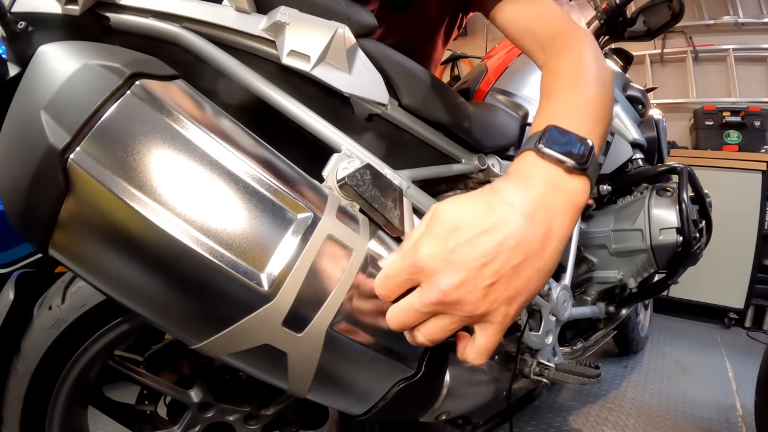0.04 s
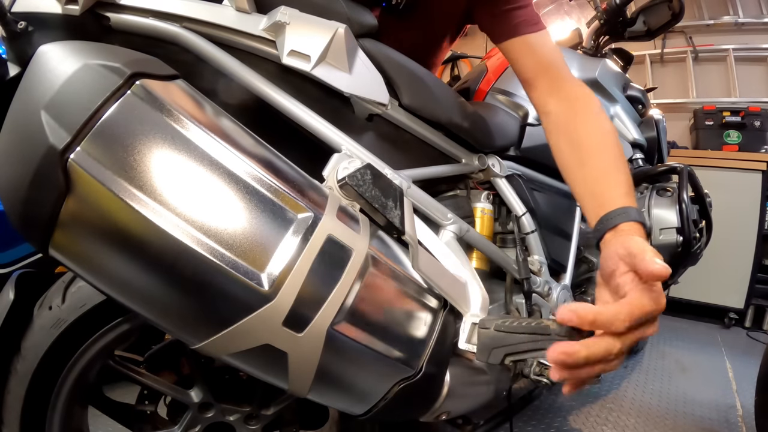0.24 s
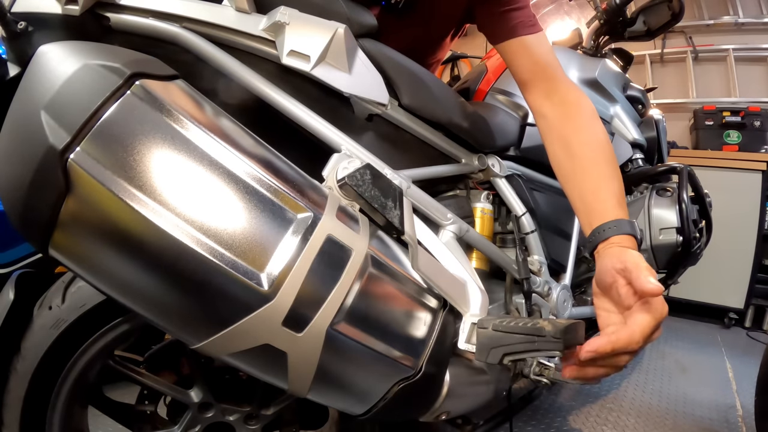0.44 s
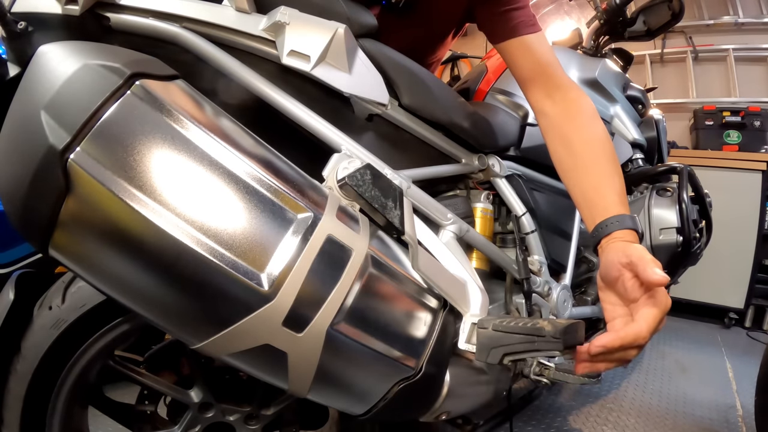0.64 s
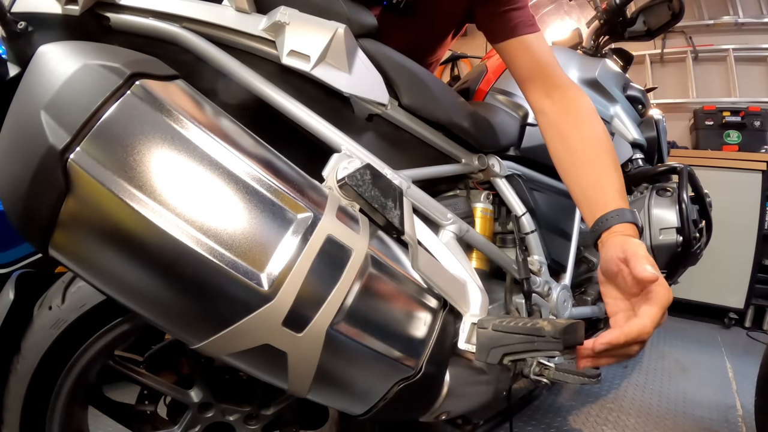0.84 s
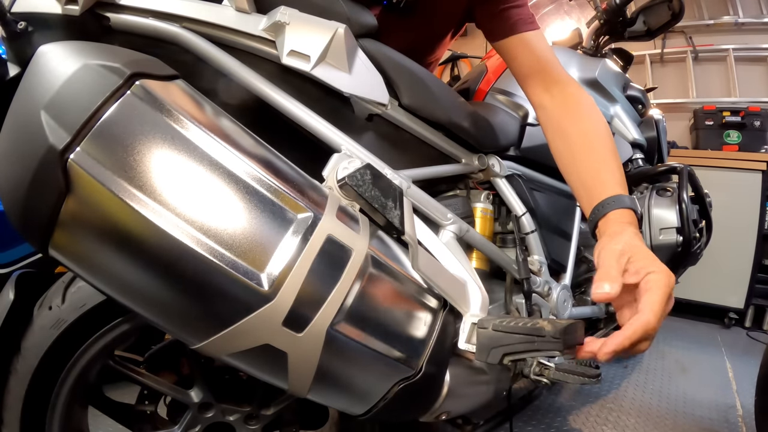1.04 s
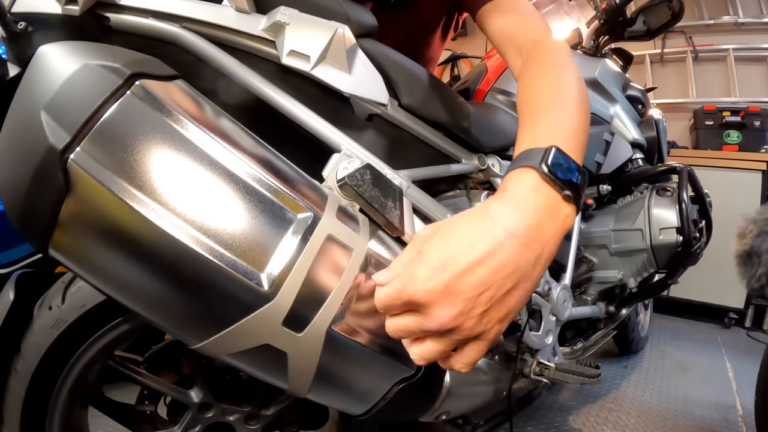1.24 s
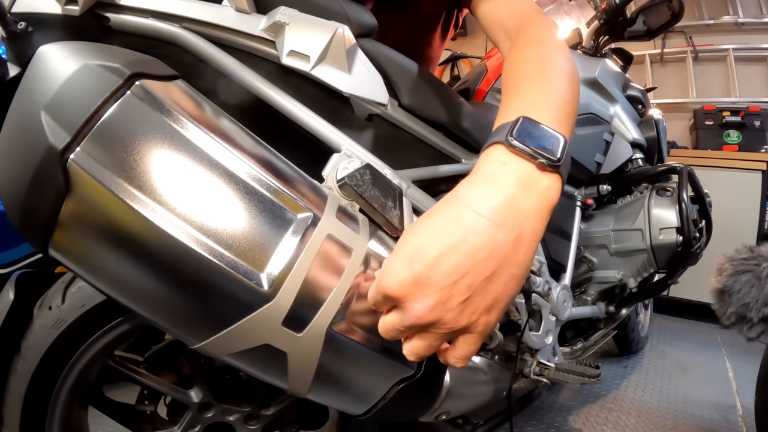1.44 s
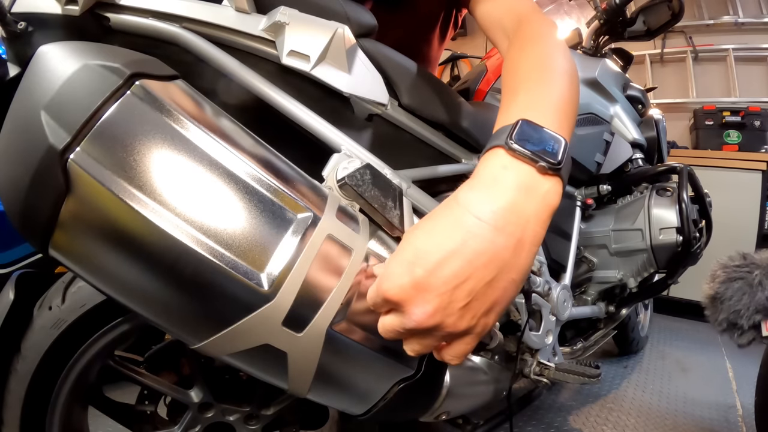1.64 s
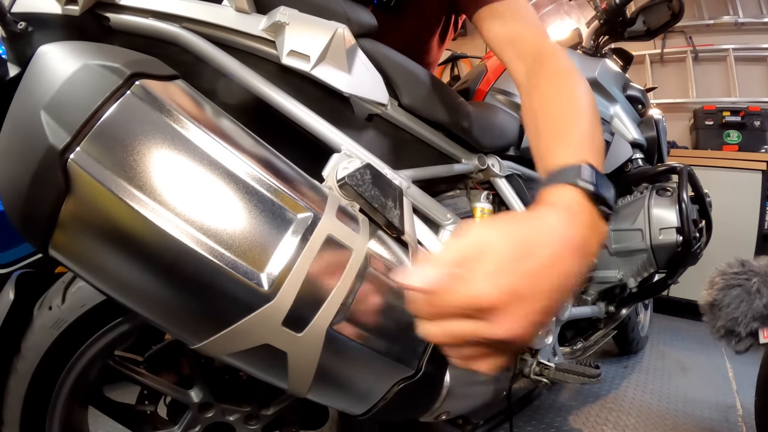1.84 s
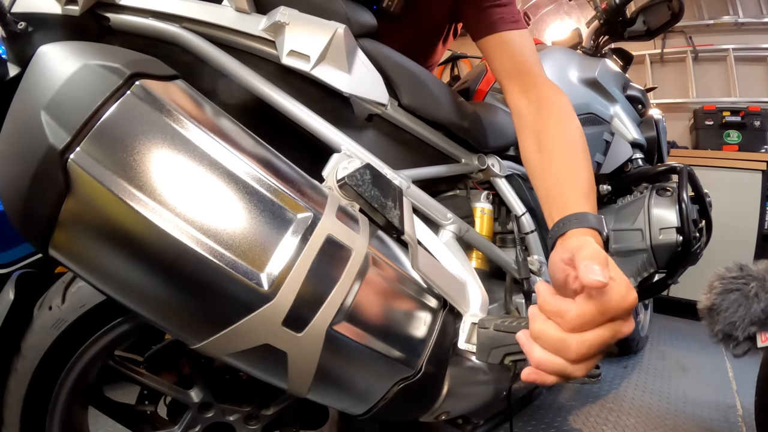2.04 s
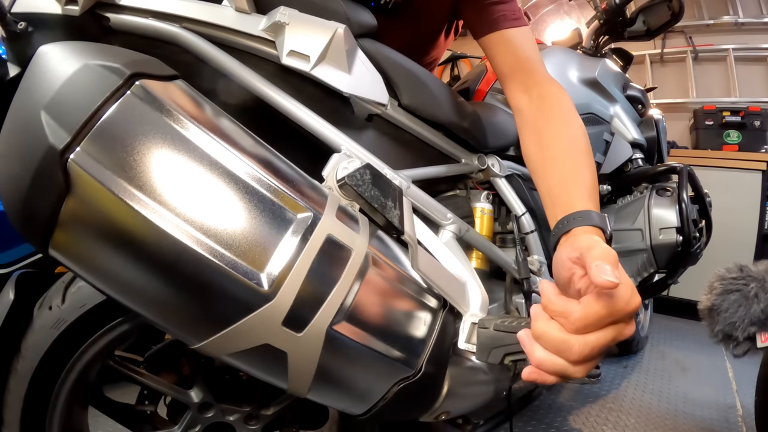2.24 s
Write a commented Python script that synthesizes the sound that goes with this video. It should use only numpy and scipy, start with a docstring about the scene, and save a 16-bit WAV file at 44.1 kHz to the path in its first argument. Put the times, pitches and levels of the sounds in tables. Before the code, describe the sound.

A hand knocks on a hollow steel motorcycle silencer, very close and loud. Faint low hum, rumble and hiss run throughout. After a tiny swish, the first bright crack and hollow thump land at 0.25 s, with brief metallic ring and garage echo. At 1.17 s sound drops out momentarily; hum returns lower, with small handling ticks around 1.2-1.3 s. A slightly duller second knock follows at 1.97 s, ringing out.

```python
"""Two close taps by a hand on the steel silencer of a parked motorcycle in a garage.
From the start: low hum (three harmonics), rumble and hiss (shaped noise), small handling ticks (noise bursts).
Near 0.25 s, first tap after a faint swish: skin crack (noise burst), can thump (filtered impulse), metallic
ring (decaying sines), room echo (decaying noise). Near 1.17 s the sound drops out for an instant; the hum
returns lower. Near 1.97 s, second tap, built the same way."""
import sys
import numpy as np
from scipy import signal
from scipy.fft import rfft, irfft, next_fast_len
from scipy.io import wavfile
from scipy.ndimage import uniform_filter1d, minimum_filter1d

SR = 44100
rng = np.random.default_rng(int(sys.argv[2]) if len(sys.argv) > 2 else 0)


def to_wav(sig):
    """Store sig (one row per channel, or 1-D mono) as 16-bit WAV at the path in sys.argv[1].

    Samples outside -1..1 are clipped; the rate is SR.
    """
    pcm = np.clip(np.atleast_2d(sig), -1, 1) * 32767
    pcm = np.round(pcm).astype(np.int16)
    wavfile.write(sys.argv[1], SR, pcm.T)  # frames by channels


N = 101429
TIME_S = np.arange(N) / SR
SIZE = next_fast_len(N, real=True)
FREQS_HZ = np.maximum(np.fft.rfftfreq(SIZE, 1 / SR), 1)

# Hum: t/s, pitch f/Hz, fundamental level/dB, second harmonic level/dB
HUM = [(0, 76.2, -56.5, -82), (.15, 72.5, -52.5, -65.5), (.66, 73.7, -54.5, -70.5), (.77, 72.36, -59, -70),
       (.97, 72.77, -50.5, -64), (1.16, 71.7, -49, -66), (1.19, 67.3, -51.5, -62.5),
       (1.52, 66.17, -51, -62.5), (1.68, 64.5, -55.5, -55.5), (1.85, 65.3, -47.5, -59),
       (1.98, 65.3, -39, -51), (2.12, 65.46, -47.5, -55), (2.22, 65.6, -54.5, -45.5),
       (2.3, 65.5, -51.5, -73)]
# Room rumble and hiss, relative spectra: f/Hz, density/(dB per Hz)
RUMBLE_SPECTRUM = [(25, -16.5), (45, -13), (85, 5), (140, -1.5), (300, -6), (700, -9), (1200, -18.5),
                   (2500, -42.5), (8000, -54.5)]
HISS_SPECTRUM = [(200, -8), (1200, 3), (2500, -0.5), (4500, -2), (8000, -9), (15500, -26)]
# Air levels: t/s, rumble level/dB, hiss level/dB
AIR_LEVELS = [(0, -60.5, -67), (.8, -59, -70), (1.16, -59, -70), (1.2, -51, -60.5), (1.34, -55.5, -59.5),
              (1.55, -56.5, -65.5), (1.85, -55.5, -64.5), (2.3, -51, -64.5)]
# Light touches and handling ticks: t/s, level/dB, centre f/Hz, half-width/octaves, T60/s
TICKS = [(.003, -58, 940, 0.29, .25), (.122, -62, 4500, 0.058, 0.048), (.202, -46.5, 4500, 0.97, .03),
         (0.629, -55.5, 1220, 0.09, 0.17), (1.198, -48.5, 787, 1.2, 0.044), (1.282, -52.5, 1180, .12, 0.13),
         (1.288, -48, 610, .3, 0.058), (1.294, -49.5, 2000, .7, 0.022), (1.309, -49, 1800, 0.65, 0.033),
         (1.893, -52, 745, 0.48, 0.24), (1.899, -47.5, 5420, .9, 0.024), (1.9527, -35.5, 4120, .6, 0.039),
         (1.954, -31, 327.2, .5, 0.42), (2.199, -60, 3042, 1.3, .03)]
# Swish ahead of each tap, relative spectrum: f/Hz, density/(dB per Hz)
SWISH_SPECTRUM = [(100, -6), (500, 2), (1500, -9), (4000, -9.5), (7000, -14.5), (15000, -33.5)]
# Taps: t/s, level/dB, treble slope/(dB per octave), crack level/dB, thump level/dB, thump f/Hz,
# thump width/ratio, low thud level/dB
TAPS = [(.2468, 0.5, -0.5, 2.5, 2, 480, 1.36, -13), (1.9733, -2, -4.5, 3, 0, 578.4, 1.27, -17)]
# Crack of the steel skin, relative spectrum: f/Hz, density/(dB per Hz)
CRACK_SPECTRUM = [(100, -15), (300, -12.5), (650, -2), (1100, -6.5), (1600, -9), (2400, -4), (3250, 3),
                  (4500, -11), (5600, -13.5), (7100, -7), (8600, -24), (10300, -22.5), (15500, -39)]
# Shell modes, strength set by the spot struck: f/Hz, T60/s, first tap level/dB, second tap level/dB
SHELL_MODES = [(140, .25, -25, -22), (393.2, 0.24, -15.5, -25), (480, 0.1, -15, -19),
               (597, .22, -14.5, -23), (653, .14, -23, -10), (850, .22, -25.5, -31.5),
               (887, .15, -23.5, -17), (1047, 0.22, -29.5, -37), (1145, .2, -25.5, -23),
               (1277, .19, -23.5, -30), (1697, .18, -29.5, -24), (2135, 0.29, -32, -30.5),
               (2512, 0.21, -29, -21.5), (2866, .15, -29.5, -37), (3130, .22, -29.5, -27.5),
               (3370, .13, -27, -22), (3500, 0.23, -35.5, -31), (4070, 0.31, -31.5, -42),
               (4840, .17, -40.5, -24.5)]
# Long, faint modes of the air in the can: f/Hz, T60/s, first tap level/dB, second tap level/dB
CAVITY_MODES = [(208.3, .6, -36, -35), (377.3, 1.0, -35, -41), (448.6, 0.69, -32.5, -40),
                (504, 0.59, -39.5, -48), (555, 1.4, -45, -50.5), (670, .62, -30, -36)]
# Garage echo, relative spectrum: f/Hz, density/(dB per Hz)
ECHO_SPECTRUM = [(60, -29), (130, -6), (240, -5.5), (400, 2.5), (650, -3.5), (800, -7.5), (1250, -7),
                 (1500, -16.5), (2300, -9.5), (3900, -9.5), (4900, -18), (7300, -16), (9000, -28),
                 (12000, -34.5), (15500, -49.5)]
# Garage echo decay: f/Hz, T60/s
ECHO_DECAY = [(100, 0.38), (500, .38), (1300, 0.3), (3500, .31), (7000, 0.34), (14000, 0.24)]
# Left-right difference against the centre: f/Hz, level/dB
WIDTH = [(30, -27), (70, -38), (140, -36.5), (350, -43), (700, -39.5), (1400, -29.5), (3000, -30.5),
         (6000, -24), (10000, -17.5), (15000, -16.5)]

HUM_WAVER_DB, HUM_WAVER_HZ, HUM_THIRD_DB = 3.27, 9, -21.5  # third harmonic re fundamental
SWISH_DB, SWISH_RISE_DB_PER_S, SWISH_LEAD_S, SWISH_LENGTH_S = -45.5, 149.5, .004, .115
SWISH_FADE_IN_S, SWISH_FADE_OUT_S = .034, .0022
SWISH_GRAIN_DB, SWISH_GRAIN_HZ = -3, 90
TREBLE_FROM_HZ = 1400
CRACK_DB, CRACK_ATTACK_S, CRACK_HOLD_S, CRACK_T60_S = -8, .0018, .0027, .025
CRACK_LEVELLING_SAMPLES = 160
THUMP_LAG_S = .0048
THUD_HZ, THUD_WIDTH_RATIO = 182, 1.6
BOUNCE_S, BOUNCE_DB, BOUNCE_CUTOFF_HZ = .0096, -11, 1390  # first reflection, off the floor
ECHO_DB, ECHO_BUILD_S = -16.5, .007
MIC_HISS_DB, MIC_SIDE_SHARE = -75.5, .55
DROPOUT_S, DROPOUT_LENGTH_S, DROPOUT_FADE_S, DROPOUT_DB = 1.1702, .0145, .008, -36
CEILING, LIMITER_S, CUTOFF_HZ = .96, .0017, 16000


def from_db(db):
    """Decibels to gain."""
    return 10 ** (np.asarray(db) / 20)


def rms_one(x):
    """Scale to unit rms."""
    return x / np.sqrt(np.mean(x ** 2) + 1e-20)


def at_hz(points, hz):
    """Interpolate a table on a log-frequency axis."""
    f, v = np.transpose(points)
    return np.interp(np.log(hz), np.log(f), v)


def in_time(rows):
    """Interpolate table columns linearly in time."""
    t, *columns = np.transpose(rows)
    return [np.interp(TIME_S, t, column) for column in columns]


def noise(spectrum_db, extra_db=0):
    """Noise of a given spectrum at unit rms, then coloured further by extra_db."""
    gain = rms_one(from_db(spectrum_db)) * from_db(extra_db)
    white = rfft(rng.standard_normal(SIZE))
    return irfft(white * gain, SIZE)[:N]


def drift(rate_hz):
    """Slow random wavering with spread 1."""
    return noise(-20 * np.log10(1 + (FREQS_HZ / rate_hz) ** 2))


def decay(age_s, t60_s):
    """Zero before age zero, then an exponential fall."""
    return (age_s >= 0) * np.exp(-np.log(1000) * np.clip(age_s / t60_s, 0, 10))


def treble_db(hz, slope_db):
    """A softer contact loses treble."""
    return slope_db * np.log2(1 + (hz / TREBLE_FROM_HZ) ** 2) / 2


def hum():
    """Low drone: fundamental and two overtones, each wavering in level."""
    hz, first_db, second_db = in_time(HUM)
    phase = 2 * np.pi * np.cumsum(hz) / SR
    out = np.zeros(N)
    for k, level_db in enumerate([first_db, second_db, first_db + HUM_THIRD_DB], 1):
        wavering_db = level_db + HUM_WAVER_DB * drift(HUM_WAVER_HZ)
        out += np.sqrt(2) * from_db(wavering_db) * np.sin(k * phase)
    return out


def air():
    """Room rumble, and a hiss that lifts while the hand moves back to the silencer."""
    rumble_db, hiss_db = in_time(AIR_LEVELS)
    rumble = from_db(rumble_db) * noise(at_hz(RUMBLE_SPECTRUM, FREQS_HZ))
    hiss = from_db(hiss_db) * noise(at_hz(HISS_SPECTRUM, FREQS_HZ))
    return rumble + hiss


def ticks():
    """Small damped contacts: decaying band noise, tilted down in the treble."""
    out = np.zeros(N)
    for t, level_db, hz, width_oct, t60_s in TICKS:
        band_db = -10 * np.log10(1 + (np.log2(FREQS_HZ / hz) / width_oct) ** 4)
        tilt_db = -10 * np.log10(1 + FREQS_HZ / hz)
        out += from_db(level_db) * decay(TIME_S - t, t60_s) * noise(band_db + tilt_db)
    return out


def swish(age_s):
    """Soft, grainy noise that grows until just before the blow."""
    early_s = -age_s - SWISH_LEAD_S
    fade_out = np.clip(early_s / SWISH_FADE_OUT_S, 0, 1)
    fade_in = np.clip((SWISH_LENGTH_S - early_s) / SWISH_FADE_IN_S, 0, 1)
    grain_db = SWISH_GRAIN_DB * drift(SWISH_GRAIN_HZ)
    level_db = SWISH_DB - SWISH_RISE_DB_PER_S * np.abs(early_s) + grain_db
    return from_db(level_db) * fade_in * fade_out * noise(at_hz(SWISH_SPECTRUM, FREQS_HZ))


def crack(age_s, slope_db):
    """The skin's crowded high modes burst out for a few milliseconds."""
    burst = noise(at_hz(CRACK_SPECTRUM, FREQS_HZ), treble_db(FREQS_HZ, slope_db))
    # even out the noise's short-term power
    local_power = uniform_filter1d(burst ** 2, size=CRACK_LEVELLING_SAMPLES)
    steady = burst / np.sqrt(local_power / np.mean(burst ** 2))
    attack = np.clip(age_s / CRACK_ATTACK_S, 0, 1)
    fall = decay(np.maximum(age_s - CRACK_HOLD_S, 0), CRACK_T60_S)
    return from_db(CRACK_DB) * steady * attack * fall


def thump(t, hz, width_ratio):
    """The weight of the finger pushes the can through about two cycles; peak 1."""
    push = np.full(N, 1e-18)
    push[int(t * SR)] = 1
    band_hz = [hz / width_ratio, hz * width_ratio]
    swing = signal.sosfilt(signal.butter(2, band_hz, "band", fs=SR, output="sos"), push)
    return swing / np.abs(swing).max()


def ring(age_s, modes, slope_db, spot):
    """Decaying modes, taking up their swing while the finger presses."""
    out = np.zeros(N)
    for hz, t60_s, *spot_db in modes:
        gain = from_db(spot_db[spot] + treble_db(hz, slope_db))
        out += gain * decay(age_s, t60_s) * np.sin(2 * np.pi * (hz * age_s + rng.random()))
    return np.clip(age_s / THUMP_LAG_S, 0, 1) * out


def echo(age_s, slope_db):
    """Diffuse reflections build up quickly and die octave by octave."""
    field = rfft(noise(at_hz(ECHO_SPECTRUM, FREQS_HZ), treble_db(FREQS_HZ, slope_db)), SIZE)
    octave = np.clip(np.round(np.log2(FREQS_HZ / 1000)), -3, 4)  # re 1 kHz
    tail = np.zeros(N)
    for k in np.unique(octave):
        band = irfft(field * (octave == k), SIZE)[:N]
        tail += band * decay(age_s, at_hz(ECHO_DECAY, 1000 * 2 ** k))
    return from_db(ECHO_DB) * np.clip(age_s / ECHO_BUILD_S, 0, 1) * tail


def bounce(blow):
    """One early, duller reflection off the floor."""
    dull = signal.sosfilt(signal.butter(1, BOUNCE_CUTOFF_HZ, fs=SR, output="sos"), blow)
    return from_db(BOUNCE_DB) * np.interp(TIME_S - BOUNCE_S, TIME_S, dull, left=0)


def taps():
    """Both blows: swish, skin crack, can thump, low thud of its mounting, bounce, ring and echo."""
    out = np.zeros(N)
    for spot, row in enumerate(TAPS):
        t, level_db, slope_db, crack_db, thump_db, thump_hz, width_ratio, thud_db = row
        age_s, pressed_s = TIME_S - t, t + THUMP_LAG_S
        blow = from_db(crack_db) * crack(age_s, slope_db)
        blow += from_db(thump_db) * thump(pressed_s, thump_hz, width_ratio)
        blow += from_db(thud_db) * thump(pressed_s, THUD_HZ, THUD_WIDTH_RATIO)
        ringing = ring(age_s, SHELL_MODES + CAVITY_MODES, slope_db, spot)
        tap = blow + bounce(blow) + ringing + echo(age_s, slope_db)
        out += from_db(level_db) * tap + swish(age_s)
    return out


def scene():
    """Sources in the centre, slight width mostly in the treble, partly shared hiss per channel."""
    centre = hum() + air() + ticks() + taps()
    # side: centre turned by 90 degrees
    side = irfft(1j * rfft(centre, SIZE) * from_db(at_hz(WIDTH, FREQS_HZ)), SIZE)[:N]
    hiss = rng.standard_normal(N) + MIC_SIDE_SHARE * rng.standard_normal((2, N))
    return np.array([centre + side, centre - side]) + from_db(MIC_HISS_DB) * hiss


def record(dry):
    """Brief dropout, fast limiter on the peaks, steep low-pass."""
    from_dropout_s = np.abs(TIME_S - DROPOUT_S) - DROPOUT_LENGTH_S / 2
    opening = np.clip(from_dropout_s / DROPOUT_FADE_S, 0, 1)
    span = max(int(LIMITER_S * SR), 1)
    allowed = CEILING / np.maximum(np.abs(dry).max(axis=0), CEILING)
    limiter = uniform_filter1d(minimum_filter1d(allowed, span), span)
    held = dry * limiter * np.maximum(opening, from_db(DROPOUT_DB))
    return signal.sosfilt(signal.ellip(12, .1, 80, CUTOFF_HZ, fs=SR, output="sos"), held)


dry = scene()
out = record(dry)
to_wav(out)
```